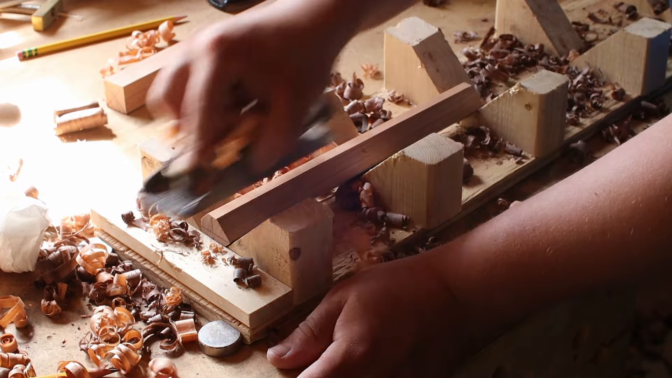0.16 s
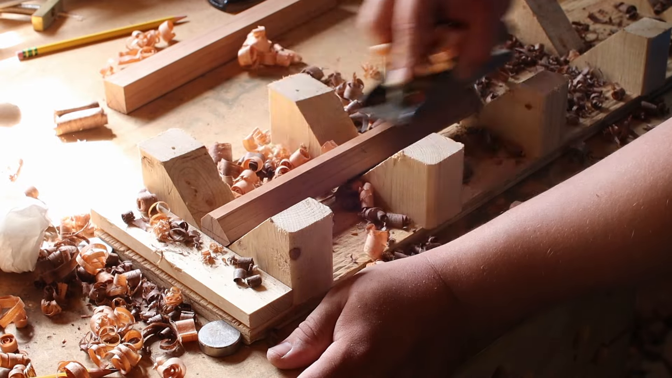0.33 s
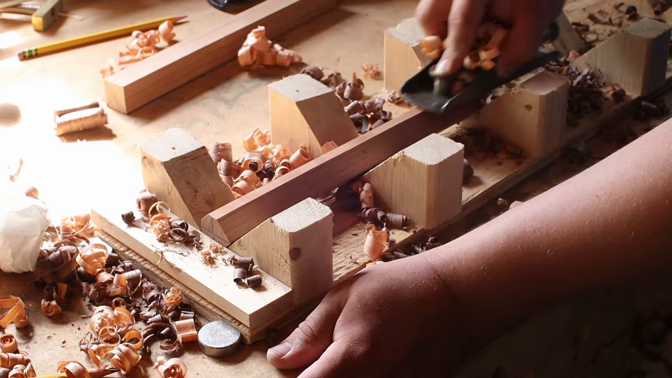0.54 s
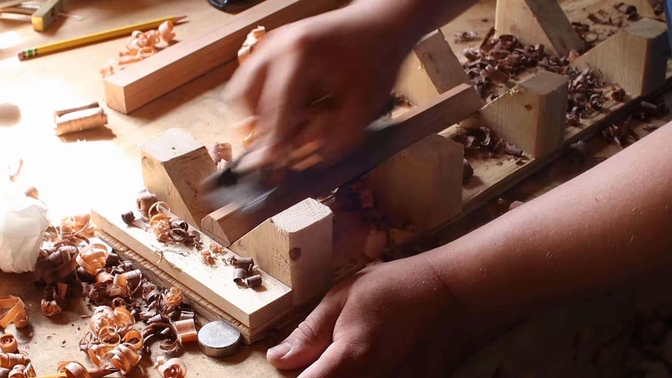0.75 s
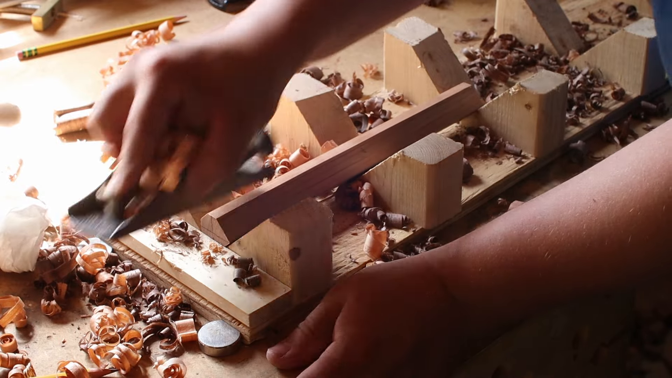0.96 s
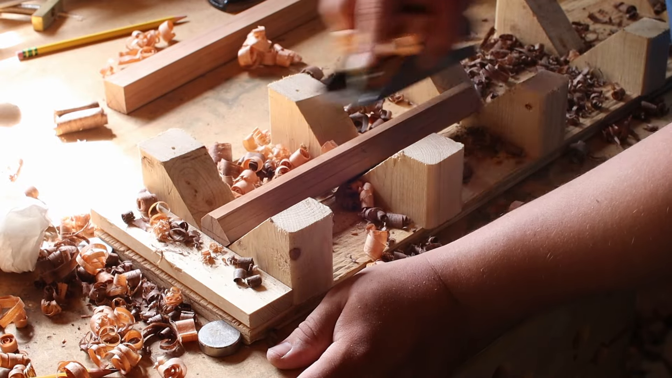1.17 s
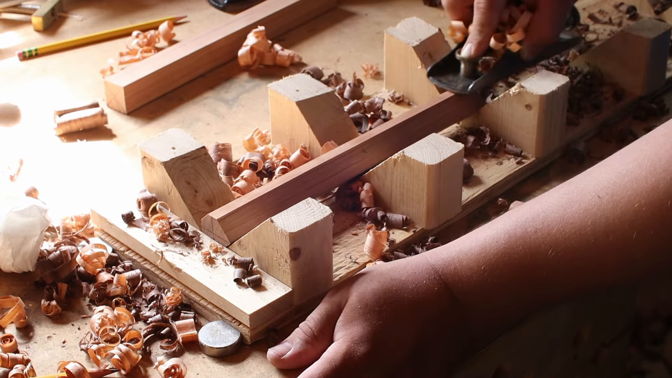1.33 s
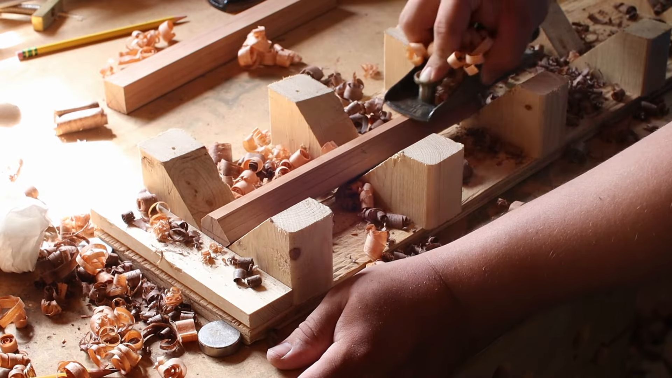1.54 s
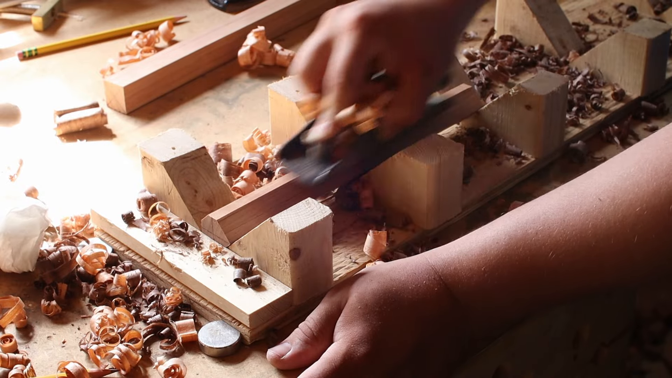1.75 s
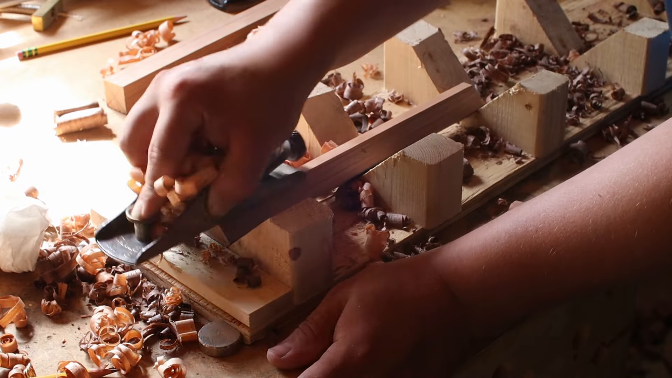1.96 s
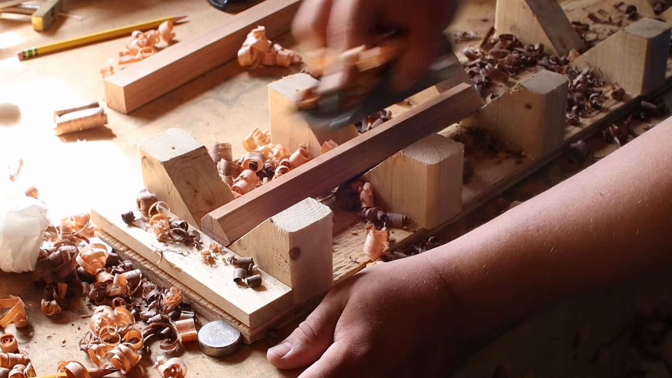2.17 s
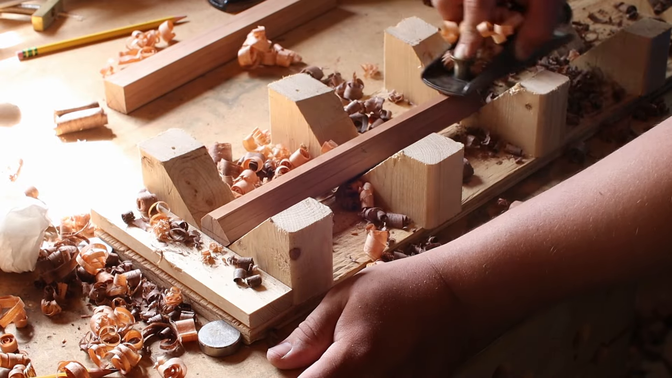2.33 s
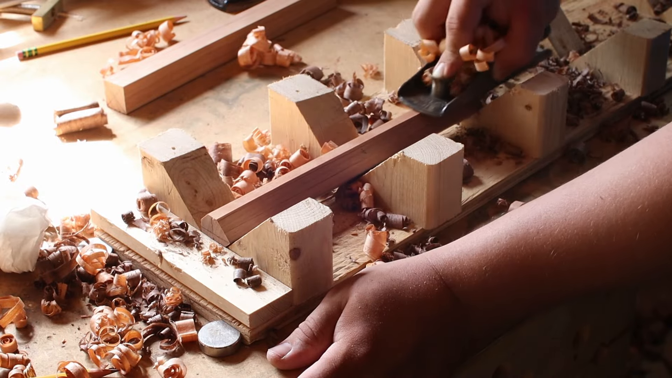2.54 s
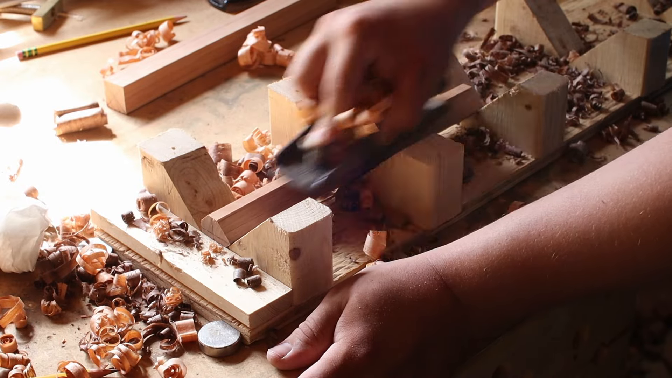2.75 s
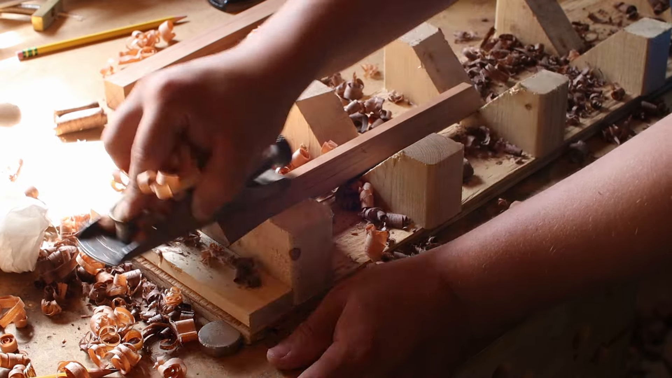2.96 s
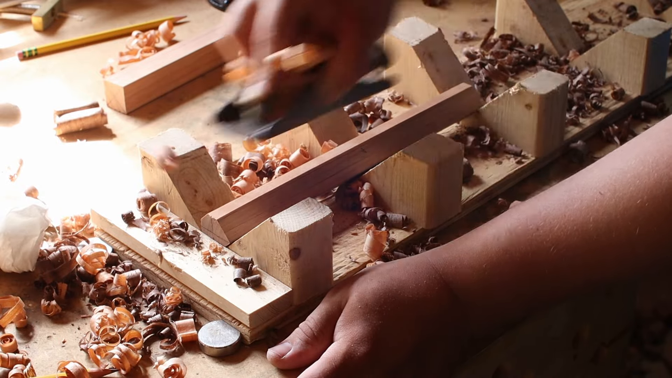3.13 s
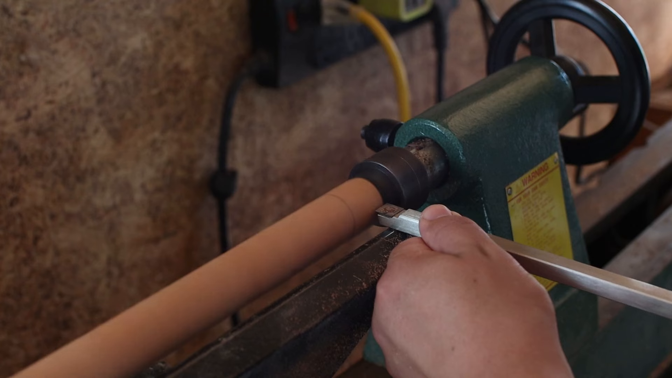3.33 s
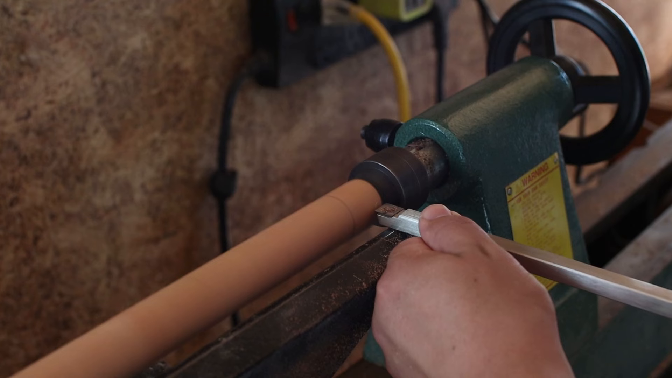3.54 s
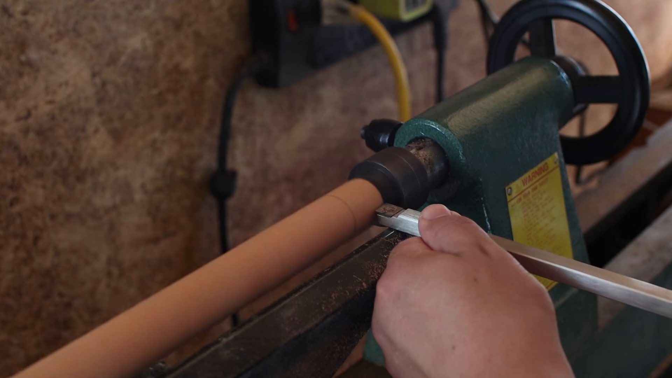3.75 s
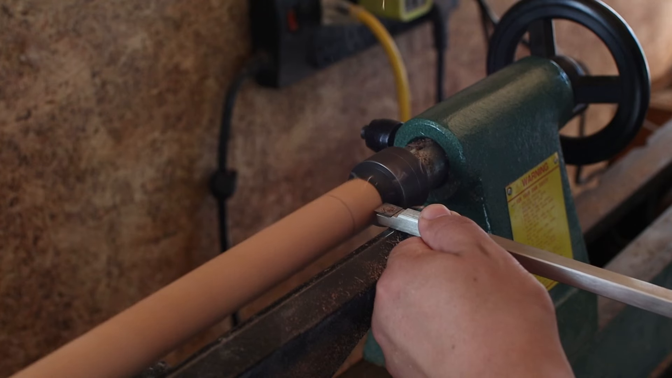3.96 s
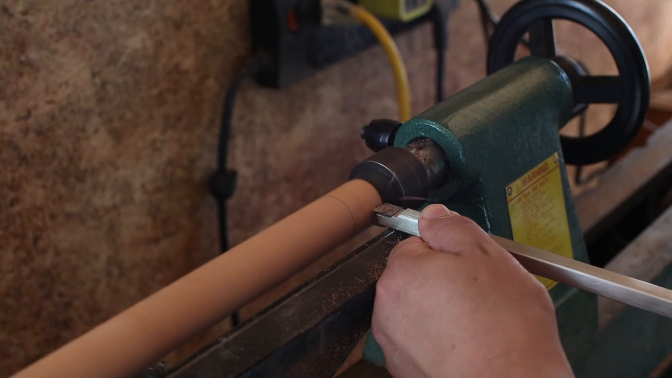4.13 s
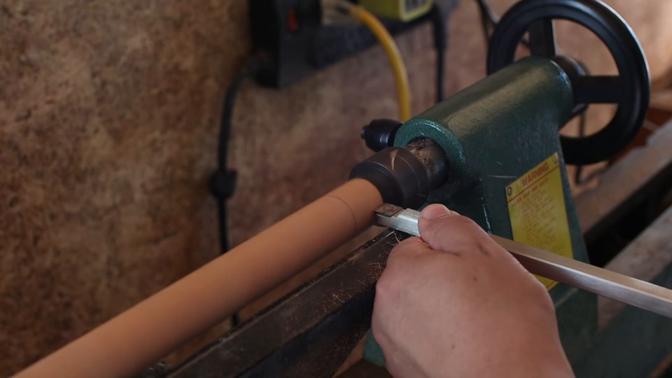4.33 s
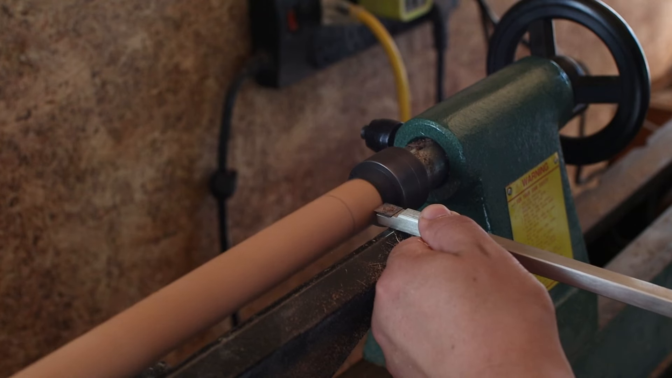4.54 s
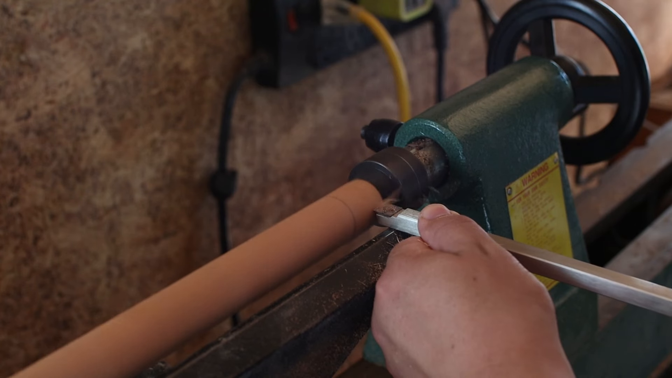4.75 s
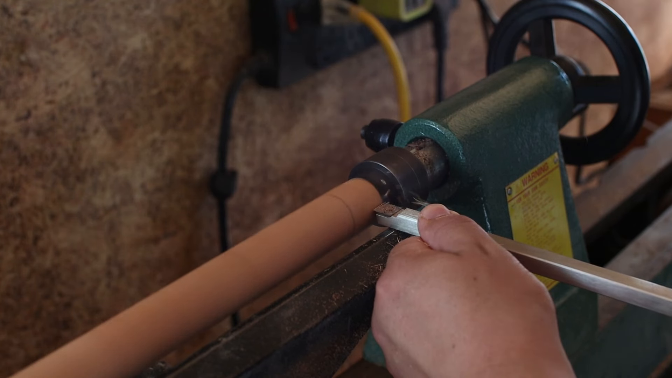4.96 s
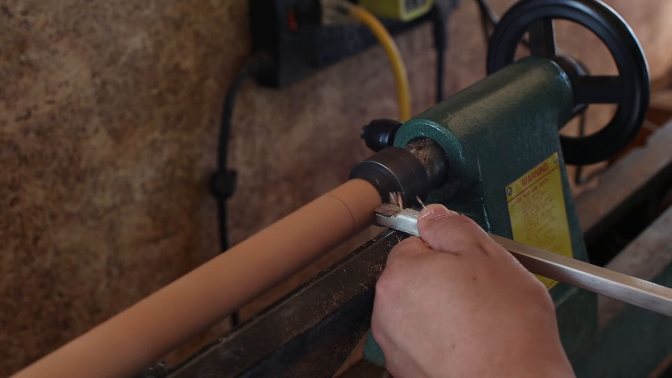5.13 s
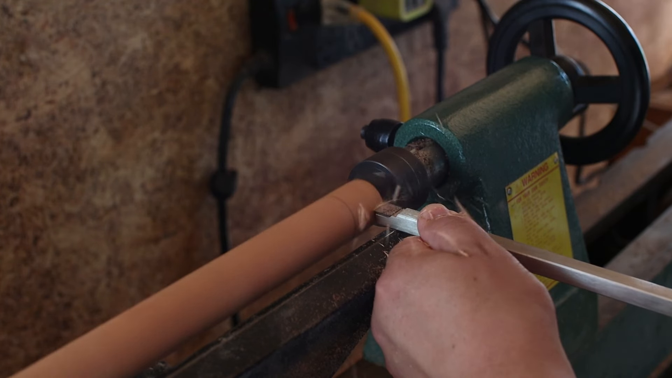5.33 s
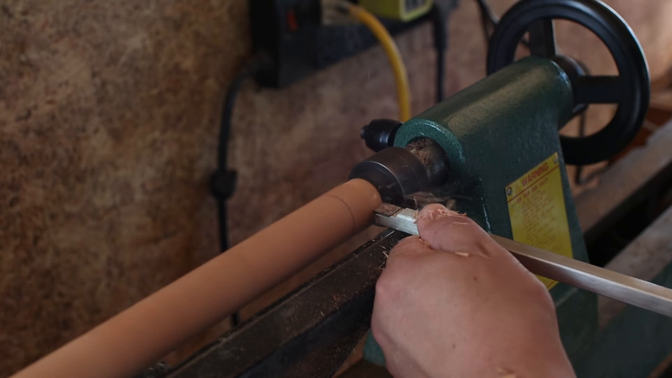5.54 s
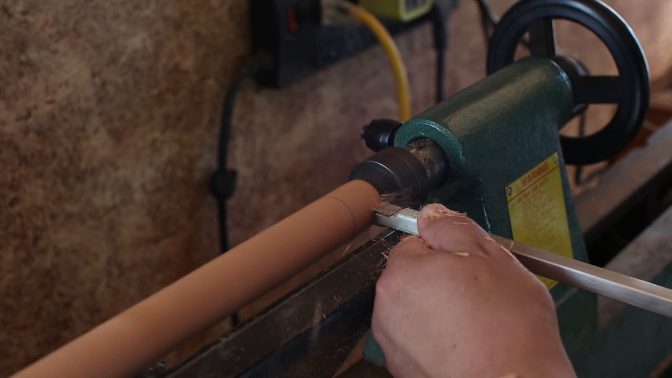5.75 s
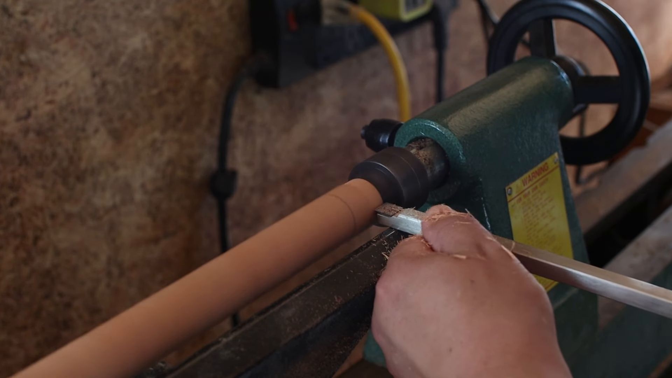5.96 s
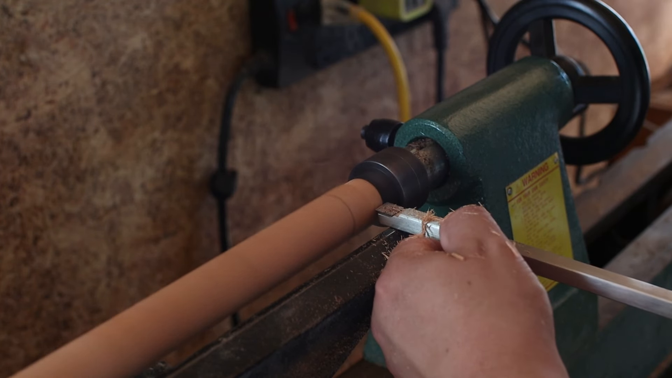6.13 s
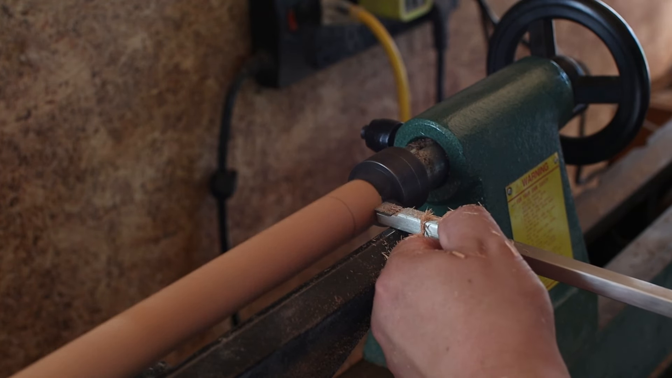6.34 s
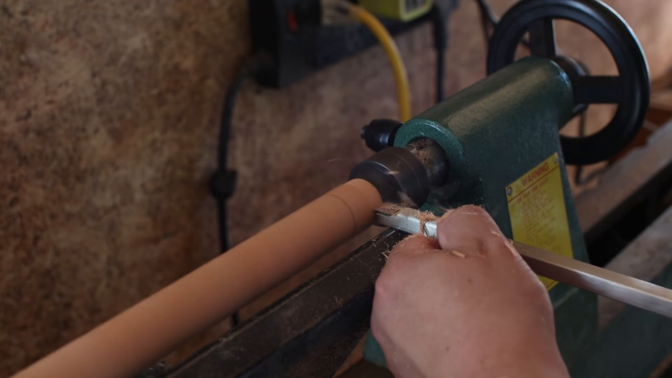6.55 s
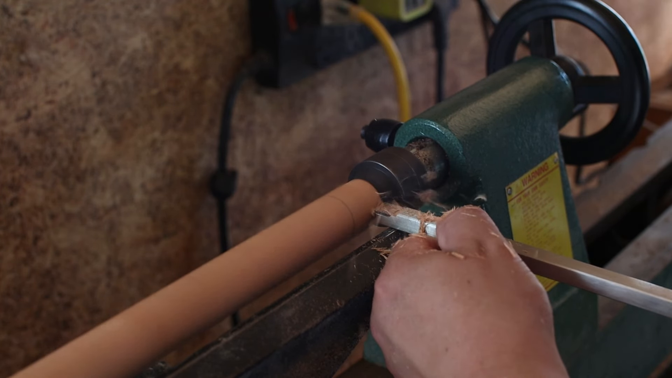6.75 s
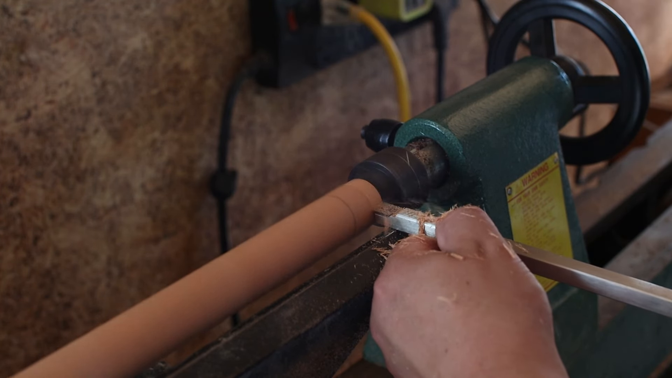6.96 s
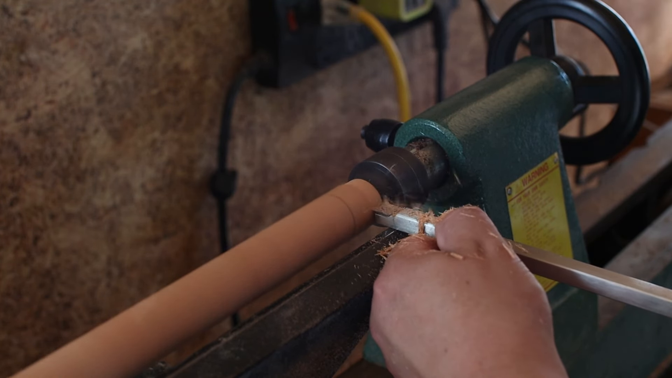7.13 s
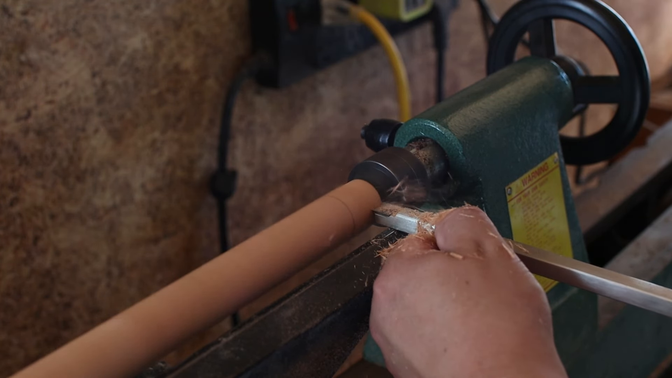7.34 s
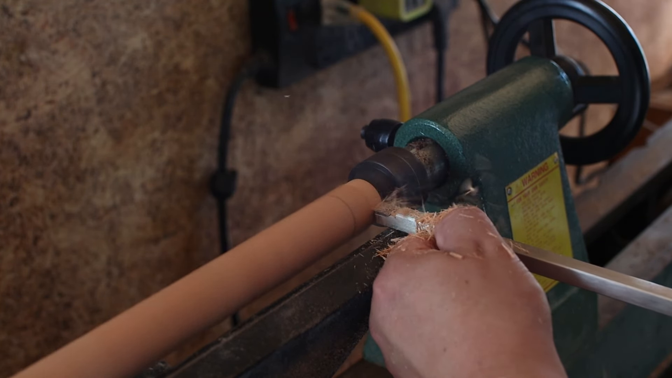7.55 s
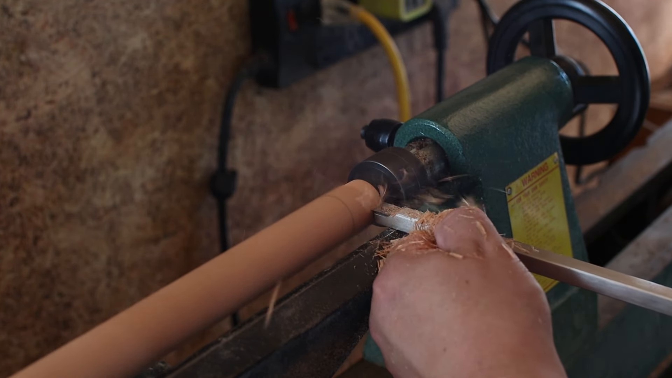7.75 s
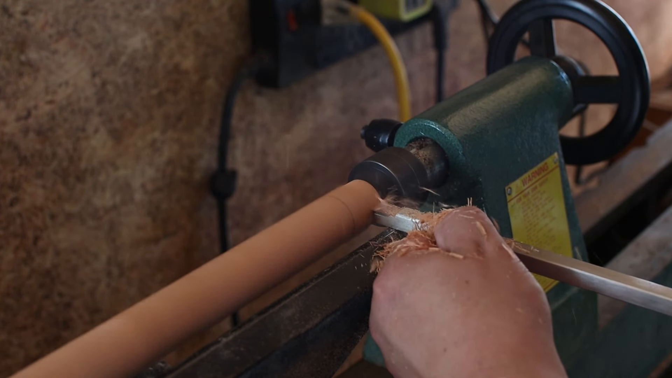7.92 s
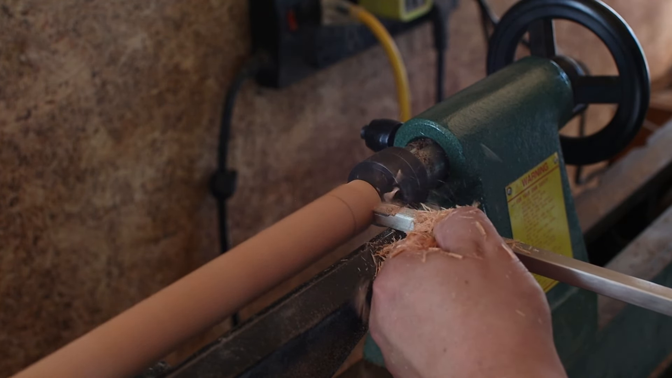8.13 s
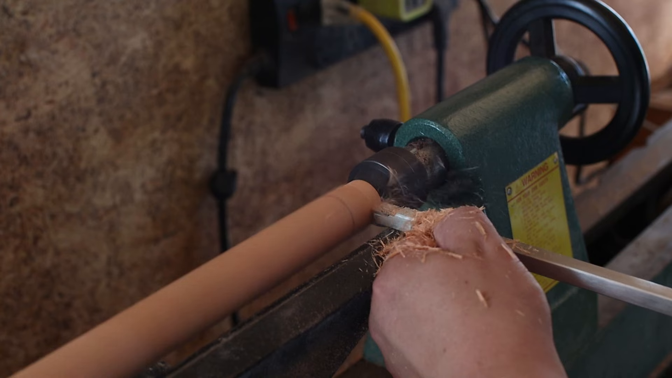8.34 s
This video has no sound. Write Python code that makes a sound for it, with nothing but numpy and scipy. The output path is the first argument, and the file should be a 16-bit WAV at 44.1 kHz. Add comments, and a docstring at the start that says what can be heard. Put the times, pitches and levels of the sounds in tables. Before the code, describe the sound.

Close up in a small workshop, a hand plane makes four short strokes on a wooden strip, each a rising, papery rasp ending in hollow scrapes and knocks, with clacks as it is set back. At about 3.3 seconds it switches abruptly to a lathe: steady wavering hum, light ticking, then rhythmic chisel nicks growing into a rough, fluttering cut.

```python
"""Hand plane, then wood lathe

A small hand plane takes four strokes along a strip of wood in a jig: it knocks down, rasps along and drops off
the end. Fibre clicks, gliding strip modes and struck modes make it. Then a lathe runs with a hum of wavering
tones and a light tick. A chisel nicks the high side of the spindle once a turn, bites over more and more of
each turn, and ends in a full, chattering cut: clicks and noise, gated by the turning ridges, ring steel and bed."""
import sys
import numpy as np
from scipy import signal
from scipy.io import wavfile
from scipy.ndimage import uniform_filter1d, map_coordinates

SR = 44100
rng = np.random.default_rng(int(sys.argv[2]) if len(sys.argv) > 2 else 0)


def transcribe(signal):
    """Save signal, clipped to [-1, 1], as a 16-bit WAV file at the path in sys.argv[1]."""
    frames = np.atleast_2d(signal).T
    limited = np.clip(frames, -1, 1)
    pcm = np.round(limited * 32767).astype(np.int16)
    wavfile.write(sys.argv[1], SR, pcm)


N = 374409
T = np.arange(N) / SR
SPINDLE_HZ = 17.14

# Rumble spectrum of the sole on wood. Each row: frequency in Hz, relative level in dB.
SOLE_SPECTRUM = [(50, -27), (150, -15), (260, -7), (380, 3), (600, 3), (900, -6), (1600, -6.5), (4000, -43)]


def amp(db):
    """Decibels to gain."""
    return 10 ** (np.asarray(db) / 20)


def unit(x):
    """Scales to rms 1."""
    return x / np.sqrt(np.mean(x ** 2) + 1e-20)


def read(points, hz):
    """Reads a spectrum on a log-frequency axis."""
    f, value = np.transpose(points)
    return np.interp(np.log(hz + 1), np.log(f + 1), value)


def add(mix, s, sound):
    """Adds a sound at time s."""
    part = mix[max(round(s * SR), 0):][:len(sound)]
    part += sound[:len(part)]


def colour(x, points):
    """Causal minimum-phase filter with the given spectrum."""
    log_gain = np.log(amp(read(points, abs(np.fft.fftfreq(4096, 1 / SR)))))
    taps = np.fft.ifft(np.exp(np.conj(signal.hilbert(log_gain)))).real
    return signal.oaconvolve(x, taps[:len(taps) // 2])[:len(x)]


def low_cut(x, hz):
    """Steep high-pass."""
    return signal.sosfilt(signal.butter(4, hz, "high", fs=SR, output="sos"), x)


def ring(x, modes):
    """Passes x through parallel resonances."""
    out = 0
    for hz, width_hz, db in modes:
        out = out + amp(db) * signal.lfilter(*signal.iirpeak(hz, hz / max(width_hz, 2), SR), x)
    return out


def resonate(x, hz, width_hz):
    """A resonance that follows the curve hz; its double pole gives steep skirts."""
    turn, r = np.exp(2j * np.pi * np.cumsum(hz) / SR), np.exp(-np.pi * width_hz / SR)
    return (turn * signal.lfilter([(1 - r) ** 2], [1, -2 * r, r * r], x / turn)).real


def drift(hz):
    """Smooth chance of about rms 1, changing about hz times a second."""
    knots = rng.standard_normal(N // 8)
    return map_coordinates(knots, [T * hz], order=1, mode="wrap") * np.sqrt(3 / 2)


def fibres(per_s, spread_db):
    """Snapping fibres: dense clicks of uneven size."""
    size = amp(np.clip(spread_db, 0, 5) * np.minimum(rng.exponential(1, N), 4))
    return unit(size * rng.standard_normal(N) * (rng.random(N) < per_s / SR))


def crackle(x, patchy_db, size):
    """Every chip has its own colour: random patches across the spectrum, in frames of size samples."""
    z = signal.stft(x, nperseg=size)[2]
    patches = uniform_filter1d(rng.standard_normal(z.shape), size=2, axis=0)
    patches = unit(uniform_filter1d(patches, size=3, axis=1))
    return signal.istft(z * unit(amp(patchy_db * patches)), nperseg=size)[1][:N]


def swing(fastest):
    """Speed of the hand, 0-1: a slow push up to its fastest moment, then a quick stop."""
    push_s, brake_s = 0.17, 0.13
    return np.exp(-((T - fastest) / np.where(T < fastest, push_s, brake_s)) ** 2)


def strokes():
    """The plane's travel sets the strip's pitch; its speed sets the gains of sole, strip and shaving."""
    # Each row: set down in s, fastest moment in s, off the end in s, strip resonance at the fastest moment
    # in Hz, relative levels of sole rumble, strip and shaving hiss in dB, fading of the loose shaving in dB/s.
    passes = [(0, 0.037, 0.11, 1740, -35, -28.5, -35, 82), (0.622, 0.865, 0.928, 1798, -42, -39, -36, 130),
              (1.53, 1.902, 2.011, 1704, -38.5, -27.5, -37.5, 171.5),
              (2.573, 2.903, 3.013, 1739, -40, -26.5, -36.5, 123)]
    set_down_s, lift_db_per_s = 0.00046, 648.5  # the sole lands, and later leaves the wood
    climb_oct_per_s, climb_below_oct, climb_above_oct = 3.2, 1.2, 0.17
    glide_db = -9  # the sole rumbles less at full speed
    strip_law, strip_creep = 2.26, 0.018  # power of the speed, and what is left at a creep
    shaving_law, shaving_creep = 1.48, 0.13
    strip_lead_s = 0.042  # the strip is loudest just before the top speed
    loose_db = -19.5  # rustle of the loose shaving against its hiss in the cut
    hz, sole, strip, shaving = np.zeros((4, N))
    for down, fastest, off, top_hz, sole_db, strip_db, shaving_db, fall_db_per_s in passes:
        pushing, after, speed = T < fastest, np.maximum(T - off, 0), swing(fastest)
        on_wood = np.clip((T - down) / set_down_s, 0, 1) * amp(-lift_db_per_s * after)
        climb_oct = np.clip(climb_oct_per_s * (T - fastest), -climb_below_oct, climb_above_oct)
        hz = np.where((T >= down) | (hz == 0), top_hz * 2 ** climb_oct, hz)
        sole += on_wood * amp(sole_db + glide_db * speed)
        strip += on_wood * amp(strip_db) * (strip_creep + swing(fastest - strip_lead_s) ** strip_law)
        curl = (T > off) * amp(loose_db - fall_db_per_s * after)  # the cut shaving rustles on
        cutting = shaving_creep + np.where(pushing, speed, 1) ** shaving_law
        shaving += (on_wood + curl) * amp(shaving_db) * cutting
    return hz, (sole, strip, shaving)


def plane():
    """The iron tears fibres; the strip's resonances climb as the plane travels along it."""
    # Bending modes of the strip. Each row: multiple of its resonance, base width as a share of the pitch,
    # relative level in dB.
    bending = [(1, 0.19, 10), (.52, 0.28, -1.5), (2.08, 0.093, -2.5), (2.6, 0.04, -20), (3.2, 0.03, -8)]
    # Shaving hiss spectrum. Each row: frequency in Hz, relative level in dB.
    shaving_spectrum = [(400, -17), (1200, -3), (2200, -4.5), (4200, 2.5), (5400, -1), (7200, -17),
                        (7800, -9), (9000, -28), (11000, -13.5), (16000, -16)]
    # Ringing of the plane's body and iron. Each row: frequency in Hz, width in Hz, relative level in dB.
    iron_modes = [(2940, 45, 0), (3146, 60, -0.5), (3530, 49, 6), (4277, 52, 6.5), (4800, 85, -4),
                  (5530, 120, 0), (6280, 77, 4.5), (6850, 140, -1.5), (8440, 820, -7), (10500, 146.2, -13)]
    echo_s, echo_db = 0.0013, -8  # echo off the bench top: delay at the highest pitch, level
    hz, gains = strokes()
    base_hz = hz.max()
    steady = np.zeros(N)
    for multiple, width, db in bending:
        mode_hz = multiple * base_hz
        once = ring(rng.standard_normal(N), [(mode_hz, 1.8 * width * mode_hz, 0)])
        twice = ring(once, [(mode_hz, 4 * width * mode_hz, 0)])  # steep skirts
        steady += amp(db) * unit(twice)
    # read more slowly, all modes fall in pitch
    strip = unit(map_coordinates(steady, [np.cumsum(hz / base_hz)], order=3))
    tearing = fibres(7000, spread_db=2.3)
    echo = np.interp(T - echo_s * hz / base_hz, T, tearing)  # its notches slide down
    tearing = tearing + amp(echo_db) * echo
    hiss = unit(colour(tearing, shaving_spectrum)) + unit(ring(tearing, iron_modes))
    hiss = unit(crackle(hiss, patchy_db=1.0, size=192))
    rumble = unit(colour(rng.standard_normal(N), SOLE_SPECTRUM))
    grain = amp(1.4 * drift(300))
    return grain * (amp(-7.5) * gains[0] * rumble + amp(-6.0) * gains[1] * strip + amp(-6.0) * gains[2] * hiss)


def scrapes():
    """The sole rocks over an edge of the strip with a hollow scrape whose pitch arches and falls."""
    # Each row: start in s, length in s, top pitch in Hz, level in dB.
    rocks = [(0.083, 0.052, 1130, -41.5), (0.139, 0.051, 1100, -52.5), (0.905, 0.055, 810, -51),
             (1.519, 0.023, 800, -36.5), (1.972, 0.038, 994, -39), (1.999, 0.029, 740, -30.5),
             (2.061, 0.035, 860, -43), (2.555, 0.028, 770, -35.5), (2.97, 0.049, 1080, -34.5),
             (3.028, 0.063, 1000, -44.5)]
    top_share, bend_oct, width_hz = 0.23, 1.33, 190  # top_share: part of the length where the pitch tops
    out, t = np.zeros(N), T[:SR // 5] - .1  # the resonance settles before the touch
    for s, length_s, top_hz, db in rocks:
        done = np.clip(t / length_s, 0, 1)
        hz = top_hz * 2 ** (-bend_oct * (done - top_share) ** 2)
        touching = (done > 0) & (done < 1)
        hollow = unit(resonate(rng.standard_normal(len(t)), hz, width_hz)[touching])
        rub = unit(colour(rng.standard_normal(len(t)), SOLE_SPECTRUM)[touching])
        add(out, s, amp(db) * np.sqrt(np.sin(np.pi * done[touching])) * (hollow + amp(-10.5) * rub))
    return out


def struck(modes, t, scatter):
    """One blow on a set of modes; every point of impact weights and detunes them differently."""
    hz, db, t60 = np.transpose(modes)[:, :, None]
    detune, weight = rng.standard_normal((2, len(modes), 1))
    sign = (-1) ** np.arange(len(modes))[:, None]
    decay = amp(db + 2 * weight - 60 * t / t60)
    return (sign * decay * np.sin(2 * np.pi * hz * (1 + scatter * detune) * t)).sum(0)


def knocks():
    """The plane strikes the wood: a thud in the bench, a clack and boom, and a tick in the iron."""
    # Each row: time in s, relative levels of bench thud, wood clack and metal tick in dB.
    blows = [(0.124, -42, -28, -67), (0.501, -38, -36.5, -34), (0.591, -41.5, -45.5, -52),
             (0.915, -47, -37.5, -25), (1.03, -56.5, -58, -80), (1.388, -40, -44.5, -36),
             (1.447, -43, -50, -50), (1.521, -38, -39, -31), (2, -48, -43, -51), (2.03, -40.5, -32.5, -44),
             (2.0334, -42, -21, -31), (2.039, -43.5, -32.5, -47), (2.047, -51, -41, -46),
             (2.077, -48.5, -41, -25.5), (2.468, -40.5, -33, -36), (2.558, -37.5, -39.5, -35),
             (3.005, -55, -58, -40), (3.0136, -43, -23.5, -42), (3.022, -41, -43, -41)]
    # Modes of the bench and jig. Each row: frequency in Hz, relative level in dB, t60 in s.
    bench_modes = [(81, -26, 0.2), (173.7, -12.5, 0.26), (204, -27, 0.44), (373, 4, 0.21), (441, -3, 0.051),
                   (607, 0, 0.1), (650, -3, 0.041), (842, -3.5, 0.16), (920, 0, 0.012)]
    # Modes of the strip. Each row: frequency in Hz, relative level in dB, t60 in s.
    strip_modes = [(1230, -5, 0.04), (1422, 2, 0.034), (1816, 2.5, 0.05), (2156, 4, 0.036),
                   (2950, 1.5, 0.0085), (3010, -7, 0.039), (3590, 14, 0.0047), (4100, -4.5, 0.042),
                   (5280, -25.5, 0.015)]
    # spectra in (Hz, relative dB)
    crack_spectrum = [(100, -8.5), (900, 7.5), (1900, 10.0), (2700, 10.0), (3200, -2.5), (4050, 3),
                      (4500, -3.5), (5200, -12.0), (16000, -61)]
    tick_spectrum = [(1500, -38.0), (5500, 7.0), (9000, 3.0), (16000, -2.5)]
    bump_spectrum = [(100, -37.0), (300, 5.5), (750, 2.0), (1100, -2.0), (2000, -6.5), (6000, -69.0)]
    boom_spectrum = [(20, -36), (45, -28), (70, -3.5), (100, -8.5), (170, -7.0), (300, 2.0), (900, -47.5)]
    out, t = np.zeros(N), T[:SR // 3]
    for s, thud_db, clack_db, tick_db in blows:
        noise = rng.standard_normal(len(t))
        crack = colour(noise * (np.exp(-t / 0.0017) + 0.3 * np.exp(-t / 0.013)), crack_spectrum)
        tick = colour(noise * np.exp(-t / 0.014), tick_spectrum)
        bump = colour(noise * np.exp(-t / 0.015), bump_spectrum)
        boom = colour(noise * np.exp(-t / 0.045), boom_spectrum)
        thud = amp(thud_db - 15.5) * (unit(struck(bench_modes, t, scatter=0.046)) + 1.3 * unit(bump))
        clack = 1.25 * unit(crack) + 0.74 * unit(struck(strip_modes, t, scatter=0.031))
        clack = amp(clack_db - 21.0) * (clack + amp(-11.0) * low_cut(unit(boom), hz=47.5))
        add(out, s, low_cut(thud, hz=146) + clack + amp(tick_db - 38.0) * unit(tick))
    return out


def nicks():
    """Force of the grazing touches, up to three ridges a turn, for the chips and for the lathe body."""
    # First pass: the highest ridge and its neighbours. Each row: time in s, relative levels of chip and lathe
    # body in dB, ridge before and ridge after in dB against the highest.
    touches = [(3.645, -40.5, -48.5, -26, -24), (3.7035, -35, -35.5, -33, -26),
               (3.761, -34.5, -31.5, -28, -18), (3.821, -47, -34, -34, -3), (3.878, -42, -35, -30, -22),
               (3.9359, -30.5, -31, -8, -15), (3.994, -35, -29, -7, 0), (4.0539, -36, -29, -1.5, -0.5),
               (4.1122, -42.5, -44, -7, -9), (4.17, -41, -36.5, -0.5, -2.5), (4.228, -37, -29, -3, -4),
               (4.287, -41, -32, -2, 1.5), (4.3441, -36, -35, -7, -2), (4.404, -31.5, -26.5, -7, -13),
               (4.4645, -42, -39, -16, -12)]
    rise_s, gap_s = 0.0018, 0.0064  # swell before shaping, and time from ridge to ridge
    chip, body, t = np.zeros(N), np.zeros(N), T[:SR // 20]
    touch = (t / rise_s * np.exp(1 - t / rise_s)) ** 1.13
    for s, chip_db, body_db, before_db, after_db in touches:
        for delay_s, ridge_db in ((-gap_s, before_db), (0, 0), (gap_s, after_db)):
            add(chip, s + delay_s, amp(chip_db + ridge_db) * touch)
            add(body, s + delay_s, amp(body_db + ridge_db) * touch)
    return chip, body


def contact():
    """The edge hops over the same ridges each turn; the deeper it is fed, the more of them it reaches."""
    # How deep the chisel is fed in. Each row: time in s, depth 0-1.
    feed = [(4.8, 0.05), (5.0, 0.18), (5.3, 0.26), (5.5, 0.46), (5.82, 0.37), (5.94, 0.01), (6.45, 0.47),
            (6.56, 0.56), (6.92, 0.52), (7.0, 0.4), (7.12, 0.45), (7.25, 0.76), (8.49, 0.98)]
    # Ridges that chatter has left round the spindle. Each row: place after the high side in turns, half width
    # in turns, depth of cut that reaches it 0-1, relative level in dB.
    ridges = [(-0.515, 0.022, 0.57, 8), (-0.455, 0.022, 0.56, 5.5), (-0.38, 0.028, 0.41, 1.5),
              (-0.28, 0.036, 0.19, -2), (-0.135, 0.044, 0, -5), (-0.035, 0.076, 0.02, -2.5),
              (0.09, 0.036, 0.02, -3), (0.22, 0.073, 0.42, 1.5)]
    high_side_s = 3.3
    valley_db, valley_turns = 2, 0.37  # a deep cut takes wood between the ridges, most near the high side
    chatter_hz, chatter_share = 146, 0.38  # the chisel flutters in a deep cut
    catch_light_db, catch_deep_db = 1.8, 1.3  # unevenness of the catching in a light and a deep cut
    depth, turns = np.interp(T, *np.transpose(feed)), (T - high_side_s) * SPINDLE_HZ

    def away(place):
        """Distance in turns from a place on the spindle."""
        return abs((turns - place + .5) % 1 - .5)

    valley = amp(valley_db) * depth ** 4.4 * np.exp(-(away(0) / valley_turns) ** 2)
    power = (valley + 0.0033) ** 2
    for place, width, reach, db in ridges:
        power += np.maximum(depth - reach, 0) * (amp(db) * np.exp(-(away(place) / width) ** 4)) ** 2
    chatter = 1 + chatter_share * depth * np.cos(2 * np.pi * chatter_hz * T + drift(12))
    catch_db = np.interp(depth, [0, 1], [catch_light_db, catch_deep_db])
    force = np.sqrt(power) * chatter * amp(catch_db * drift(260))
    return force / np.sqrt(uniform_filter1d(force ** 2, 2 * round(SR / SPINDLE_HZ)) + 1e-9)


def level(tables, column, fade_s):
    """Gain from one dB column of several curves, silent between them."""
    out = np.zeros(N)
    for rows in map(np.array, tables):
        inside = np.clip(np.minimum(T - rows[0, 0], rows[-1, 0] - T) / fade_s + 1, 0, 1)
        out += inside * amp(np.interp(T, rows[:, 0], rows[:, column]))
    return out


def each_turn(hz):
    """Roughness of a turning surface: the same noise comes round hz times a second."""
    surface = rng.standard_normal(round(SR / hz))
    return surface[(T * hz % 1 * len(surface)).astype(int)]


def wood_colour(x, patchy_db, size):
    """Each spot round the spindle has its own treble colour, back every turn and changing as wood is cut."""
    hz, t, z = signal.stft(x, SR, nperseg=size)
    spots = rng.standard_normal((len(hz), 14, 16))
    turn = t * SPINDLE_HZ % 1 * spots.shape[1]
    where = np.broadcast_arrays(hz[:, None] / 650, turn, t * 2.5)
    patches = unit(map_coordinates(spots, where, order=1, mode="grid-wrap"))
    gain = amp(patchy_db * np.minimum(hz / 8000, 1)[:, None] * patches)
    gain = gain / np.sqrt(np.mean(gain ** 2, axis=1, keepdims=True))
    return signal.istft(z * gain, nperseg=size)[1][:N]


def driven(gain, source, through, shape):
    """A source of the given strength drives a filter scaled to unit power."""
    return through(gain * source, shape) / np.std(through(source, shape))


def chisel():
    """Chips tear off under the edge and ring the steel; the grain comes round each turn and shakes the bed."""
    # Two deeper passes, one curve each. Each row: time in s, relative levels of chip hiss and lathe body in dB.
    cuts = [
        [(4.8, -48.5, -44.5), (4.88, -42, -37), (5.0, -47.5, -43.5), (5.33, -38, -35.5), (5.51, -41.5, -43.5),
         (5.66, -40, -35.5), (5.82, -38.5, -39), (5.88, -44, -34), (5.96, -39, -37)],
        [(6.45, -43.5, -43), (6.6, -39.5, -39), (6.89, -38.5, -36), (6.97, -43.5, -44), (7.41, -37, -35.5),
         (7.54, -38, -35), (7.72, -36.5, -40.5), (7.77, -35.5, -36), (7.88, -36, -38.5), (8.09, -38.5, -35.5),
         (8.16, -36, -35), (8.49, -39, -35.5)],
    ]
    # Chip spectrum in the deeper passes. Each row: frequency in Hz, relative level in dB.
    chip_spectrum = [(40, -21), (300, -7), (900, -35), (1300, -7), (2400, 8), (3050, 5), (3600, 14.5),
                     (4100, 12.5), (5000, 6), (6000, 12), (7200, 5), (8200, 11.5), (9050, 7), (9700, -3),
                     (10500, 2.5), (11200, -3), (11800, -5), (16000, -11)]
    # Chip spectrum of the nicks. Each row: frequency in Hz, relative level in dB.
    nick_spectrum = [(300, -23), (1300, -8), (2400, 10.5), (3000, -2.5), (3950, 12.5), (4800, 2), (5900, 7),
                     (6900, -1), (8100, 8.5), (9600, -5), (10700, 3.5), (12000, -18), (16000, -13)]
    # Ringing of the chisel. Each row: frequency in Hz, width in Hz, relative level in dB.
    steel_modes = [(1184, 43, 4), (1606, 17, 8), (2310, 62, 1.5), (2680, 50, 3), (2850, 40, -1),
                   (3924, 70, 5.5), (4246, 23, 2), (4460, 28, 5), (5080, 50, 2), (5700, 78, -4),
                   (5940, 52, -3.5), (7570, 100, -7), (8310, 99, -18.5), (10470, 360, -6.5)]
    # Ringing of the spindle and lathe bed. Each row: frequency in Hz, width in Hz, relative level in dB.
    bed_modes = [(176.7, 7.6, -13), (240.7, 7.1, 6.5), (258.7, 6.5, 3.5), (372, 10, 12.5), (397, 34, 3),
                 (488, 17, -0.5), (544.4, 7, 3.5), (589, 36, -2.5), (660, 14.5, 6), (690.6, 8.6, 6.5),
                 (799, 6.4, 5), (800, 10, -39), (979, 16, -15)]
    body_law = 0.25  # the heavy bed follows the force of the edge less sharply than the chips do
    force, (nick_chip, nick_body) = contact(), nicks()
    chip = amp(-1.0) * force * level(cuts, 1, fade_s=0.0021)
    body = amp(4.0) * force ** body_law * level(cuts, 2, fade_s=0.0021) + nick_body
    hiss = driven(chip, fibres(12000, spread_db=1.9), colour, chip_spectrum)
    hiss = hiss + driven(nick_chip, rng.standard_normal(N), colour, nick_spectrum)
    patchy = crackle(rng.standard_normal(N), patchy_db=3, size=512)
    steel = amp(-4.5) * driven(chip + amp(-6) * nick_chip, patchy, ring, steel_modes)
    chips = crackle(hiss + steel, patchy_db=2.2, size=96)
    chips = wood_colour(chips, patchy_db=4.2, size=160)
    grain = low_cut(rng.standard_normal(N) + 0.51 * each_turn(SPINDLE_HZ), hz=178)
    bed = low_cut(driven(body, grain, ring, bed_modes), hz=152)
    return room(chips, wet_db=-11.0) + amp(-2.06) * bed


def motor():
    """Wavering tones, and bearing whirr that throbs with one scuff for each turn of the motor."""
    # Motor and belt tones. Each row: frequency in Hz, relative level in dB.
    tones = [(242.2, -57.5), (328.4, -61), (355.3, -55.5), (532.9, -60), (710.6, -64.5), (802.1, -61.5),
             (888.2, -78), (971, -66.5), (1248, -59), (1367, -63), (1513, -67), (1728, -72), (2137, -66),
             (2826, -68.5), (3690, -73), (4340, -72), (5227, -79)]
    # Spectrum of bearings and fan. Each row: frequency in Hz, relative level in dB.
    whirr_spectrum = [(24, -135), (40, -36), (243, -7.5), (290, -3), (354, -5), (491, -7), (542, -3.5),
                      (585, -12.5), (697, -2.5), (751, -14.5), (1070, -15), (1240, -10), (1590, -17),
                      (2250, -15), (2620, -22), (2860, -15.5), (3100, -36), (4400, -24), (5300, -30),
                      (6400, -40), (9000, -45.5), (16000, -65)]
    # Spectrum of the scuff, heard as a tick. Each row: frequency in Hz, relative level in dB.
    scuff_spectrum = [(150, -4), (350, 12), (800, 10), (1400, 10.5), (2300, 12), (5200, 7.5), (6500, -5.5),
                      (9000, -6.5), (10500, -27), (12000, -20), (16000, -25)]
    # Strength of the scuff. Each row: time in s, level in dB.
    scuff_curve = [(3.3, -54), (4.7, -55), (6.2, -51.5), (6.3, -59), (6.45, -61)]
    motor_hz, tick_s = 29.61, 3.308
    hum = np.zeros(N)
    for hz, db in tones:
        phase = 2 * np.pi * (hz * T + rng.random()) + 0.3 * drift(11)
        hum += amp(db + 2.5 * drift(28)) * np.sqrt(2) * np.sin(phase)
    since_turns = ((T - tick_s) * motor_hz + 0.13) % 1
    rubbing = np.exp(-(since_turns / 0.28) ** 2) + 0.44 * np.exp(-since_turns / 0.73)
    rubbing = np.minimum(since_turns / 0.08, 1) * rubbing
    throbbing = rng.standard_normal(N) * amp(1.07 * drift(70)) * (1 + 0.32 * rubbing)
    whirr = amp(-48.5) * unit(colour(throbbing, whirr_spectrum))
    scuff = unit(colour(rubbing * amp(2 * drift(22.21)) * fibres(9000, spread_db=0.0), scuff_spectrum))
    return amp(0.5) * hum + whirr + amp(np.interp(T, *np.transpose(scuff_curve))) * scuff


def room(x, wet_db):
    """Adds the workshop's reflections, each band dying at its own speed."""
    # Each row: frequency in Hz, t60 in s.
    decay_times = [(150, 0.4), (400, 0.49), (1040, 0.44), (2760, 0.32), (7280, 0.1)]
    taps = rng.standard_normal(SR // 2) * (rng.random(SR // 2) < .1)
    hz, t, z = signal.stft(taps, SR, nperseg=256)
    tail = signal.istft(z * amp(-60 * t / read(decay_times, hz)[:, None]), SR, nperseg=256)[1]
    tail = tail * np.clip(T[:len(tail)] / 0.00017 - 1, 0, 1)
    return x + amp(wet_db) * signal.oaconvolve(x, tail / np.linalg.norm(tail))[:N]


def air():
    """Steady background noise behind the planing."""
    # Each row: frequency in Hz, relative level in dB.
    air_spectrum = [(20, -24), (65, -1), (150, -16), (400, -6), (1000, -18), (4000, -16.5), (16000, -33)]
    return amp(-76.5) * unit(colour(rng.standard_normal(N), air_spectrum))


def scene():
    """First the planing bench, then the lathe."""
    lathe_on_s = 3.286
    bench = room(plane() + scrapes() + knocks(), wet_db=-10.5) + air()
    lathe = motor() + chisel()
    running = np.clip((T - lathe_on_s) / .002, 0, 1)
    return ((1 - running) * bench + running * lathe)[None]


def record(dry):
    """Limits the band with a linear-phase low-pass."""
    edge_hz = 16150
    return signal.oaconvolve(dry, signal.firwin(511, edge_hz, window=("kaiser", 9), fs=SR)[None], "same")


dry = scene()
out = record(dry)
transcribe(out)
```